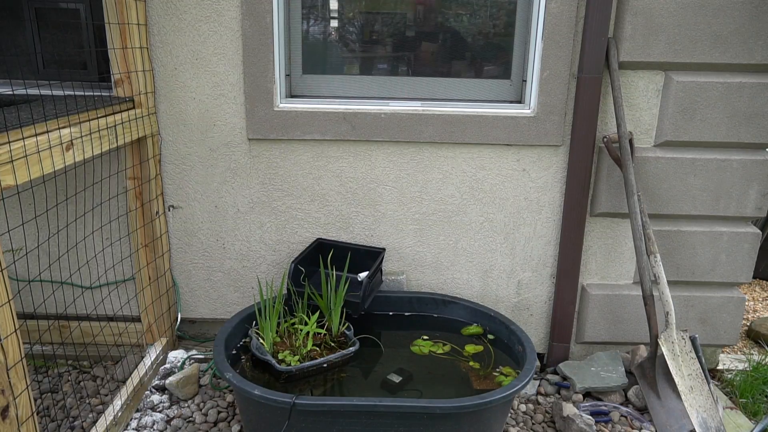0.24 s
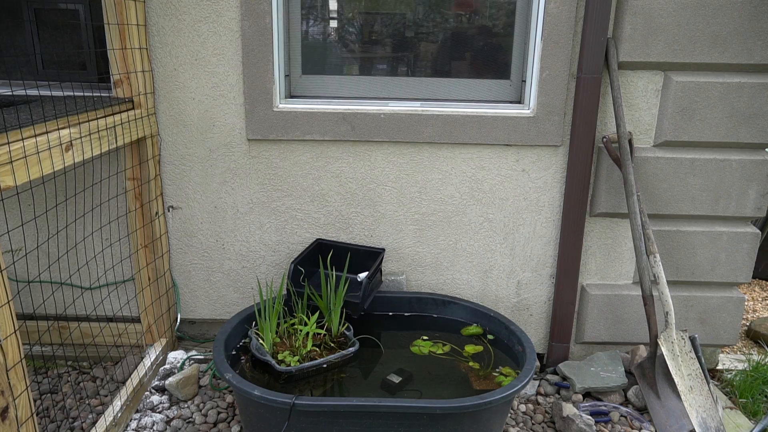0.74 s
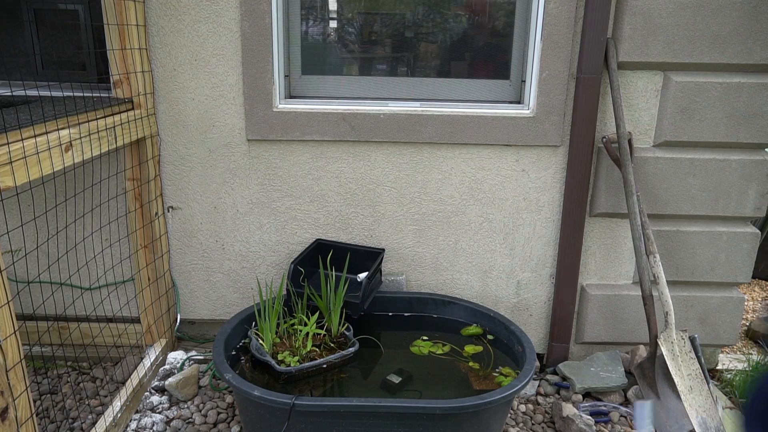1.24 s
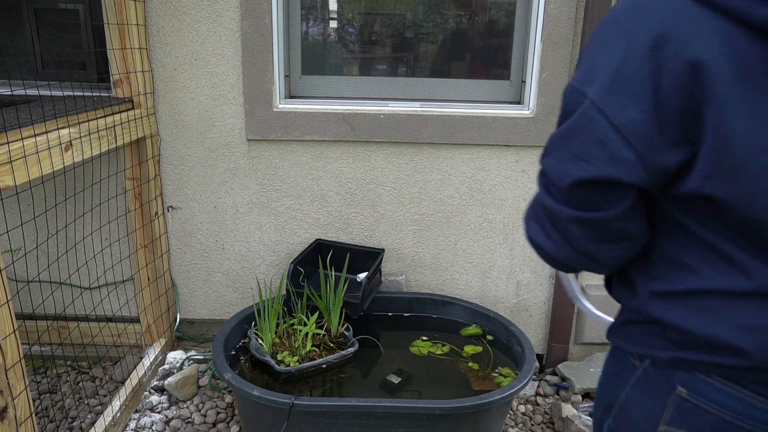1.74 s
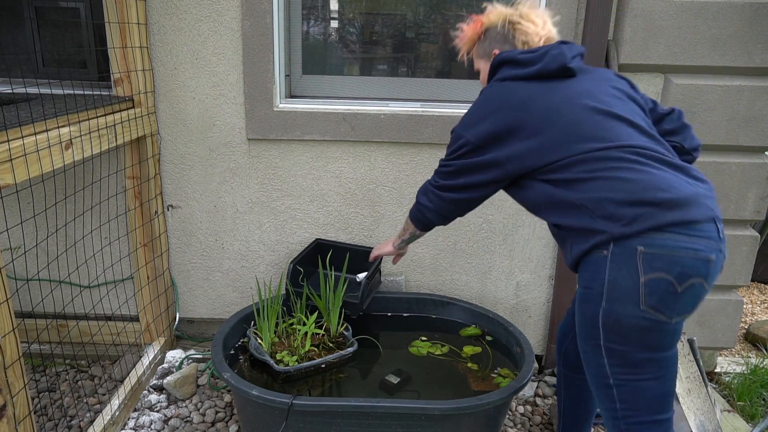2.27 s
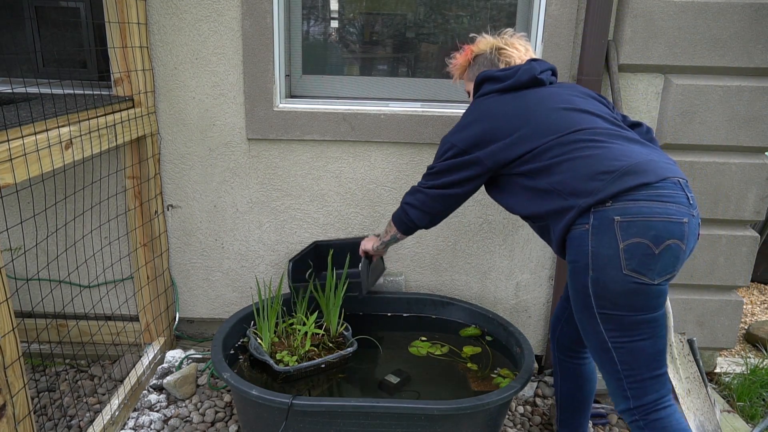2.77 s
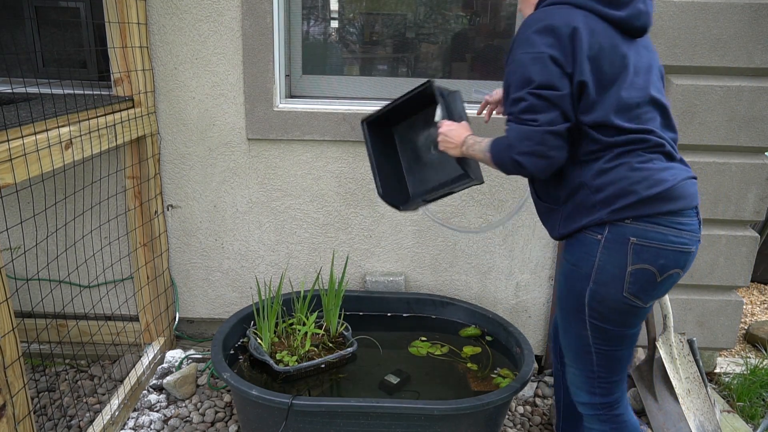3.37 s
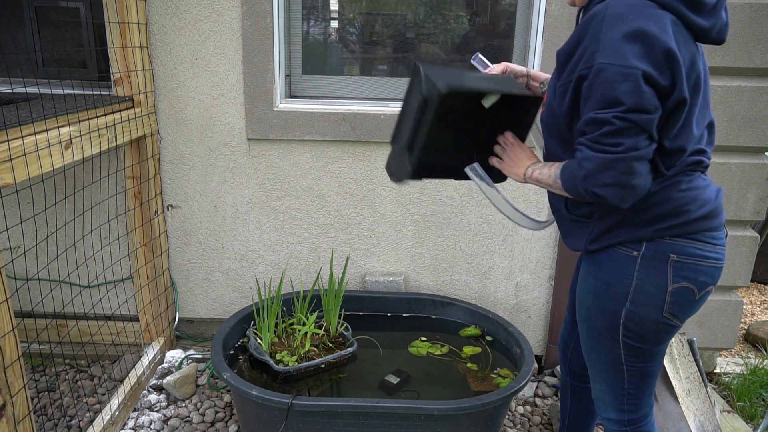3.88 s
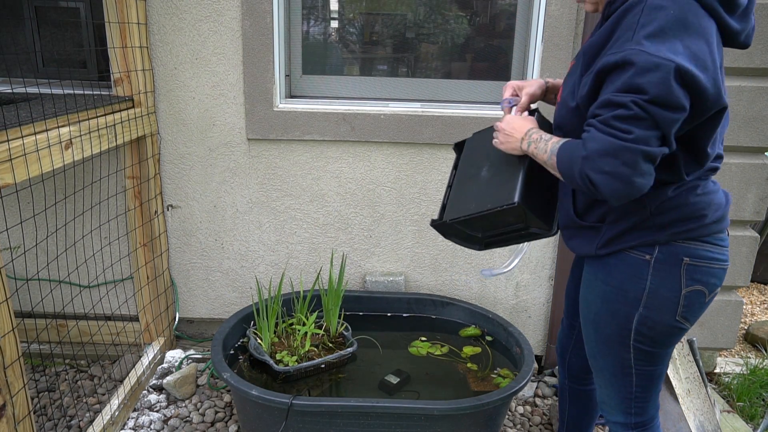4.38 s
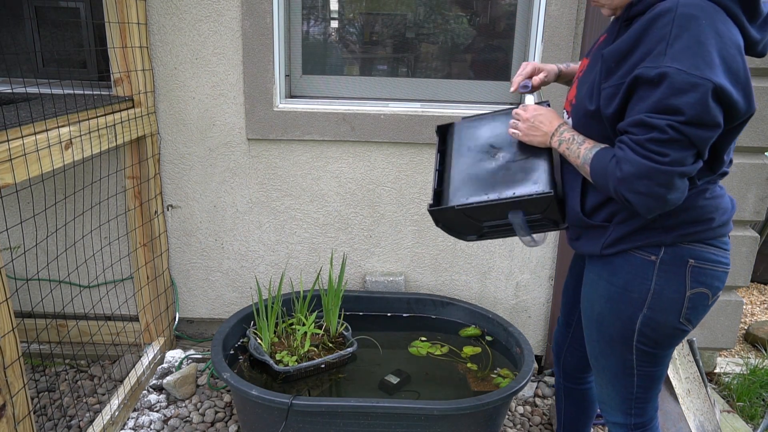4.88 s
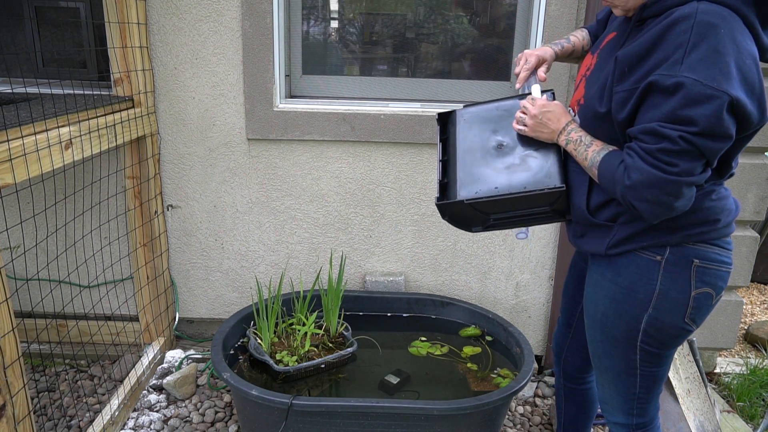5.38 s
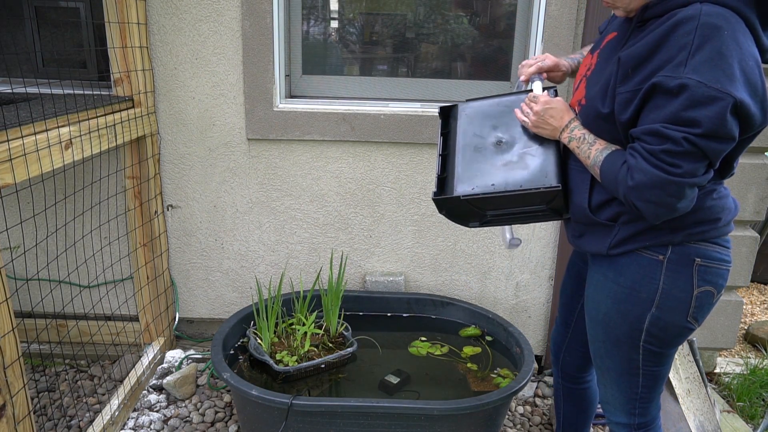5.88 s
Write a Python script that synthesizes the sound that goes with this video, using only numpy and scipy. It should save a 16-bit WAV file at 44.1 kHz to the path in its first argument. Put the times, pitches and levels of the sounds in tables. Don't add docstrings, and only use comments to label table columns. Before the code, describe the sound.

Small birds chirp, buzz, cluck and whistle throughout a small walled yard with short echoes. Gravel ticks and crunches under shifting feet, then a hollow plastic box scrapes free, clacks hard on a tub edge and gives scattered hollow knocks as it is carried. Wind buffets the small camera microphone over distant traffic rumble.

```python
import sys
import numpy as np
from scipy import signal
from scipy.fft import rfft, irfft, next_fast_len
from scipy.io import wavfile
from scipy.ndimage import uniform_filter1d, map_coordinates

SR = 44100
rng = np.random.default_rng(int(sys.argv[2]) if len(sys.argv) > 2 else 0)


def store_wav(level_fs):
    pcm = np.round(np.clip(np.atleast_2d(level_fs), -1, 1) * 32767)
    wavfile.write(sys.argv[1], SR, pcm.T.astype(np.int16))


def boost_factor(decibels):
    exponent = np.asarray(decibels, float) / 20
    return 10 ** exponent


N = 269892


def unit(x):
    return x / np.sqrt(np.mean(x ** 2) + 1e-20)


def along(points, hz):
    point_hz, value = np.transpose(points)
    return np.interp(np.log(hz + 1), np.log(point_hz + 1), value)


def wobble(rate, size=N):
    knots = rng.standard_normal(size // 20 + 8)
    return map_coordinates(knots, [2 + np.arange(size) * min(rate, 2000) / SR])


def filtered(x, spectrum):
    size = x.shape[-1]
    padded = next_fast_len(size + 8192)
    gain = boost_factor(along(spectrum, np.fft.rfftfreq(padded, 1 / SR)))
    return irfft(rfft(x, padded) * gain, padded)[..., :size]


def add(bus, s, x, pan_db):
    start = round(s * SR)
    x = x[max(-start, 0):]
    part = bus[:, max(start, 0):][:, :len(x)]
    part += x[:part.shape[1]] * boost_factor([[pan_db / 2], [-pan_db / 2]])


def voice(track, overtones_db, burr, edge, trill_hz=0, droop_db=0):
    s, hz = np.transpose(track)
    t = np.arange(round(s[-1] * SR)) / SR
    size = len(t)
    trill = trill_hz * np.sin(2 * np.pi * 68 * t + 2.41 * wobble(40.04, size=size))
    phase = 2 * np.pi * np.cumsum(np.interp(t, s, hz) + trill) / SR
    rough, burr_hz = burr
    grain = 1 - rough + rough * (wobble(burr_hz, size=size) + 1j * wobble(burr_hz, size=size))
    grain = grain * boost_factor(2.5 * rough * wobble(45, size=size))
    tone = 0
    for k, db in enumerate(overtones_db, 1):
        tone = tone + boost_factor(db - droop_db * k * t / s[-1]) * np.imag(grain * np.exp(1j * k * phase))
    fade = np.sin(np.pi / 2 * np.clip(np.minimum(t / edge, (s[-1] - t) / (2 * edge)), 0, 1)) ** 2
    return tone / np.sqrt(np.mean(abs(grain) ** 2) / 2) * fade


# frequency [hz], t60 [s]
YARD = [(300, 0.15), (2000, 0.3), (5000, 0.47), (11000, 0.17)]


def yard(bus, wet_db):
    hz, t, z = signal.stft(rng.standard_normal((2, SR // 2)), SR, nperseg=256)
    tail = signal.istft(z * boost_factor(-60 * t / along(YARD, hz)[:, None]), SR, nperseg=256)[1]
    tail = np.pad(tail / np.linalg.norm(tail[0]), ((0, 0), (250, 0)))
    return bus + boost_factor(wet_db) * signal.fftconvolve(bus.mean(0)[None], tail, axes=1)[:, :N]


def flock(notes, burr, edge, wet_db, side_db=0, sag=0., trill_hz=0, droop_db=0):
    bus = np.zeros((2, N))
    for start, end, first_hz, last_hz, db, *pan_db in notes:
        length = end - start + edge
        middle_hz = (first_hz + last_hz) / 2 * (1 - sag)
        track = [(0, first_hz), (length / 2, middle_hz), (length, last_hz)]
        tone = voice(track, [0, -32], burr, edge, trill_hz, droop_db)
        add(bus, start - edge / 2, boost_factor(db) * tone, side_db + sum(pan_db))
    return yard(bus, wet_db)


# rough share [0-1], burr rate [hz]
BURR = dict(slide=(.55, 150), clear=(.2, 35), buzz=(.55, 280), cluck=(.6, 300), warble=(.35, 120),
        far=(.35, 35), chirp=(.45, 250), rasp=(.85, 900))
# start_s, length_s, first_hz, level_db
SLIDES = [(0.715, 0.26, 3747, -52.5), (1.675, 0.31, 3788, -49.5), (3.608, 0.23, 3750, -49),
          (4.859, 0.25, 3930, -51.5)]


def sliders():
    fall_hz_per_s = 4050
    slides = [(s, s + length, hz, hz - fall_hz_per_s * length, db) for s, length, hz, db in SLIDES]
    top = [(s, s + 0.067, 6300, 6300, db - 18.0) for s, _, _, _, db in slides]
    return flock(slides + top, BURR["slide"], edge=.022, wet_db=-4.0, side_db=17.0, sag=0.027,
                 trill_hz=85.0, droop_db=-1.5)


# start_s, first_hz, level_db
BUZZES = [(0.323, 3872, -47), (1.118, 3750, -51), (2.552, 3960, -49.5), (3.998, 3850, -49.5),
          (5.434, 3865, -48), (6.057, 3885, -48.5)]
# start_s, level_db
UPSLURS = [(0.712, -52.5), (3.599, -60), (4.88, -60)]


def buzzers():
    buzzes = [(s, s + 0.037, hz, hz - 113, db) for s, hz, db in BUZZES]
    top = [(s, end, 6300, 6250, db - 14.0) for s, end, _, _, db in buzzes]
    upslurs = [(s, s + 0.0413, 5110, 5500, db, -4) for s, db in UPSLURS]
    return flock(buzzes + top + upslurs, BURR["buzz"], edge=0.016, sag=-0.0296, wet_db=-2.5, side_db=20.0)


# start_s, first_hz, level_db
CLUCKS = [(0.279, 1610, -62), (0.54, 1744, -65), (0.78, 1720, -61), (1.068, 1744, -51), (1.476, 1780, -50),
          (1.757, 1700, -52), (2.24, 1740, -52), (3.879, 1874, -53), (6.03, 1776, -62)]


def cluckers():
    clucks = [(s, s + 0.0376, hz, hz - 126, db) for s, hz, db in CLUCKS]
    return flock(clucks, BURR["cluck"], edge=0.00487, wet_db=-8, side_db=2.0)


# start_s, end_s, first_hz, last_hz, level_db
WARBLES = [(2.478, 2.503, 2260, 2320, -43), (2.87, 2.935, 2125, 2064, -51), (3.088, 3.115, 2150, 2090, -41),
           (4.862, 4.915, 2030, 1990, -49.5), (5.03, 5.095, 2023, 2070, -49.5),
           (2.435, 2.465, 2376, 2240, -43.5), (2.47, 2.5, 2550, 2515, -44.5), (2.5, 2.56, 2080, 1945, -56),
           (4.09, 4.17, 3196, 3148, -51), (4.145, 4.21, 2360, 2145, -52.5), (4.19, 4.25, 2660, 2700, -43.5),
           (4.27, 4.3, 2700, 2580, -68), (4.31, 4.41, 3250, 3180, -53.5), (4.41, 4.48, 2234, 2290, -55),
           (4.43, 4.5, 2667, 2694, -47)]
# start_s, end_s, first_hz, last_hz, level_db
SIGH = [
    (-.075, -0.035, 3250, 3000, -48),
    (0, .055, 2850, 2788, -40),
    (.055, .115, 2768, 2430, -43.5),
]
# accent_s, slowness [factor]
SIGHS = [
    (3.539, .97),
    (5.557, 1.03),
]


def warblers():
    sighs = [(s + slow * start, s + slow * end, first_hz, last_hz, db)
             for s, slow in SIGHS for start, end, first_hz, last_hz, db in SIGH]
    return flock(WARBLES + sighs, BURR["warble"], edge=0.016, wet_db=-3.0, droop_db=1.5, sag=0.015)


# start_s, end_s, first_hz, last_hz, level_db
RASPS = [(3.501, 3.535, 2830, 2410, -43.5), (5.511, 5.54, 2900, 2390, -44), (2.977, 2.993, 2300, 1550, -41),
         (3.617, 3.672, 6760, 7700, -62), (4.524, 4.604, 7020, 5500, -65), (4.676, 4.737, 7000, 5500, -66),
         (5.005, 5.064, 4720, 4550, -58.5), (5.114, 5.127, 3090, 2500, -45.5),
         (5.14, 5.162, 2754, 2700, -47.5), (0.398, .43, 4620, 4540, -60), (5.239, 5.342, 4670, 4920, -65)]


def raspers():
    notes = [(*note, 2.5 * (note[2] - 2300) / 1000) for note in RASPS]
    return flock(notes, BURR["rasp"], edge=0.00228, wet_db=-4.0)


# start_s, end_s, pitch_hz, level_db
HELD = [(0.455, 0.51, 1790, -65), (0.587, 0.655, 7440, -65), (1.335, 1.383, 5500, -62),
        (1.39, 1.477, 5500, -54.5), (1.53, 1.608, 5480, -90), (1.317, 1.49, 4020, -67),
        (2.073, 2.328, 4053, -57), (2.428, 2.778, 4013, -61.5), (2.816, 2.993, 3970, -57),
        (3.068, 3.27, 3970, -55.5), (3.368, 3.7, 3986, -61.5), (3.765, 3.93, 3810, -53.5),
        (3.93, 3.99, 3790, -61), (4.416, 4.585, 1833, -65.5), (4.726, 4.797, 5440, -69),
        (6.064, 6.135, 7500, -59.5)]
# start_s, end_s, first_hz, last_hz, level_db
FAR_RIGHT = [(0.37, 0.95, 5480, 5570, -66), (1.083, 1.31, 5370, 5510, -62.5),
             (1.152, 1.384, 2515, 2370, -73), (1.153, 1.4, 3420, 3250, -63),
             (1.602, 1.99, 4265, 4080, -64.5), (2.455, 2.7, 5110, 4770, -68),
             (5.804, 5.858, 3550, 3400, -66.5)]
# start_s, end_s, first_hz, last_hz, level_db
FAR_LEFT = [(0, 0.24, 6920, 6680, -71), (0.473, 0.56, 4680, 5380, -59.5), (2.467, 2.584, 7050, 7400, -66),
            (2.804, 2.858, 4700, 5900, -62), (5.085, 5.156, 4800, 5030, -58),
            (5.148, 5.195, 5140, 7030, -64), (5.185, 5.232, 3500, 3760, -58.5),
            (5.191, 5.267, 7220, 7400, -67), (5.328, 5.401, 3030, 3290, -62.5)]


def far_whistlers():
    held = [(start, end, hz, hz, db, -6) for start, end, hz, db in HELD]
    right = [(*note, -14) for note in FAR_RIGHT]
    left = [(*note, 12) for note in FAR_LEFT]
    return flock(held + right + left, BURR["far"], edge=0.022, trill_hz=27.0, wet_db=-3)


def slurred(note, burr):
    s, hz, db = np.transpose(note)
    tone = voice(np.transpose([s - s[0], hz]), [0, -32], burr, 0.0042)
    level_db = np.interp(np.arange(len(tone)) / SR, s - s[0], db)
    return np.pad(tone * boost_factor(level_db), (round(s[0] * SR), 0))


# time_s, pitch_hz, level_db
SLURS = [
    [(2.345, 3360, -50), (2.365, 3060, -45.5), (2.405, 2820, -45), (2.435, 2780, -44)],
    [(2.935, 2830, -49), (2.955, 3130, -45), (2.99, 3100, -48)],
    [(2.963, 2780, -45), (2.985, 2390, -42), (3.0, 2310, -39), (3.015, 2450, -50), (3.04, 2500, -43),
     (3.07, 2260, -48)],
    [(4.888, 2400, -59), (4.92, 2940, -47), (4.955, 3370, -42)],
    [(4.943, 2810, -38), (4.958, 2544, -41.5), (4.972, 2400, -37.5), (5.0, 2406, -47.5), (5.03, 2290, -50)],
    [(5.665, 3600, -52), (5.688, 3470, -38.5), (5.708, 3270, -54)],
]
# time_s, pitch_hz, level_db
WHISTLE = [(2.44, 3400, -59), (2.5, 3370, -57), (2.6, 3317, -54.5), (2.71, 3170, -60)]


def slurs():
    bus = np.zeros((2, N))
    for note in SLURS:
        add(bus, 0, slurred(note, BURR["warble"]), 0.5)
    add(bus, 0, slurred(WHISTLE, BURR["clear"]), -14)
    return yard(bus, -4.5)


# start_s, pitch [factor], level_db, length [factor], lead of the rising voice_s
SPARROW = [(.001, 0.98, -53.5, 0.88, 0.017), (0.199, 0.95, -54.5, 1.02, 0.019),
           (0.396, 0.99, -53, 0.84, 0.014), (0.628, 1.03, -55, 0.87, 0.019),
           (0.772, 1.01, -46, 0.95, 0.022), (4.338, 0.97, -48, 1.08, 0.02), (5.463, 1.01, -53, 0.77, 0.018),
           (5.672, 1.04, -53, 0.8, 0.017), (5.881, 0.99, -54, 1.0, 0.012), (6.084, 1.03, -49, 0.94, 0.014)]
# time_s, pitch_hz
HOOK = [(0, 4089), (.03, 4010), (.043, 3700), (.052, 2790), (.067, 1920)]
# time_s, pitch_hz
FAR_HOOK = [(0, 4060), (.01, 4210), (.03, 4030), (.039, 3680), (.047, 3300), (.056, 2300)]
# time_s, pitch_hz
RISE = [(0, 1640), (.012, 2604), (.025, 3270), (.05, 3356), (.09, 3280)]
# time_s, pitch_hz
FAR_RISE = [(0, 2850), (.007, 3180), (.018, 3300), (.06, 3360)]
# late_s, level_db
WALLS = [
    (0, 3),
    (.013, -1),
    (0.026, -13),
]
# frequency [hz], level_db
HEDGE = [(2200, -1), (3100, -0.5), (3600, 4), (4200, 0.5), (7000, -2.5)]


def sparrow():
    perch, hedge = np.zeros((2, 2, N))
    burr = BURR["chirp"]
    for s, pitch, db, length, lead in SPARROW:
        bright_db = 1.4 * (db + 50.5)
        overtones_db, stretch = [0, -21 + bright_db], [length, pitch]
        if db > -50:
            bus = perch
            hook = boost_factor(db + 4.5) * voice(np.multiply(HOOK, stretch), overtones_db, burr, 0.0076, droop_db=6)
            rise = voice(RISE, [-5, 0], burr, 0.029, droop_db=7.5)
        else:
            bus = hedge
            hook = boost_factor(db - 1.5) * voice(np.multiply(FAR_HOOK, stretch), overtones_db, burr, 0.0076, droop_db=-1)
            rise = voice(FAR_RISE, [-12, -1.5], burr, 0.0045, droop_db=4.5)
        rise = boost_factor(db - 3) * rise
        rasp = voice(np.multiply(RISE[:3], [1, pitch]), [-6, 0, -11], BURR["rasp"], 0.0019)
        rasp = boost_factor(db - 9 + bright_db) * rasp
        for late, echo_db in WALLS:
            add(bus, s + late, boost_factor(echo_db) * hook, 4.5)
            add(bus, s - lead + late, boost_factor(echo_db) * rise, 4.5)
            add(bus, s - lead + late, boost_factor(echo_db) * rasp, 4.5)
    return yard(perch, -3.5) + yard(filtered(hedge, HEDGE), -3.5)


def ring(modes, t, detune=0.):
    spread = rng.normal(0, 1, (len(modes), 2))
    total = 0
    for k, (hz, db, t60) in enumerate(modes):
        decay = boost_factor(db + spread[k, 0] - 60 * t / t60)
        total = total + (-1) ** k * decay * np.sin(2 * np.pi * hz * (1 + detune * spread[k, 1]) * t)
    return total


def crack(t, t60, spectrum):
    return unit(filtered(rng.standard_normal(len(t)), spectrum)) * boost_factor(-60 * t / t60)


BLOW_T = np.arange(SR // 2) / SR
SNAP = [(400, 2), (1200, 8.5), (2800, 8.5), (11000, -13.5)]

# frequency [hz], level_db, t60 [s]
THUD = [(194.5, 2, 0.14), (329, 7, 0.052)]
# frequency [hz], level_db, t60 [s]
HOLLOW = [(438.2, 3.5, 0.065), (535, 6, 0.058)]
# frequency [hz], level_db, t60 [s]
PANELS = [(812, 15.5, 0.024), (974, 9.5, 0.036), (1279, 14, 0.014)]
# frequency [hz], level_db, t60 [s]
RIM = [(1628, 0, 0.031), (2076, -1, 0.032), (2566, -4, 0.02), (3250, -2, 0.025)]
# start_s, snap_db, then against it thud_db, hollow_db, panels_db
RESTING = [(1.228, -43.5, -15, 1.5, -13), (1.295, -46.5, -22, -6, 0.5), (2.0471, -42.5, -3, -11, -5)]
LIFTED = [(3.3102, -17.5, -15, -12, -23), (3.5336, -19, -23, -8.5, -15.5), (3.7477, -32, -19, -12.5, -18),
          (3.9046, -38.5, -19, -10.5, -7)]
CARRIED = [(4.0705, -34.5, -9, 6.5, -2), (4.8, -31, -4.5, 9, 0.5), (5.075, -46.5, -9, 0.5, -3.5),
           (5.541, -26, -3.5, 5.5, 4.5), (5.7348, -46.5, -8, 10, -2), (5.7464, -44, -27, 7.5, -3.5)]
# level_db; the freer the box, the more it rings
RIM_DB = (-22, -9.5, 6)


def knocks():
    bus, t = np.zeros((2, N)), BLOW_T
    for stage, rim_db in zip((RESTING, LIFTED, CARRIED), RIM_DB):
        for s, db, thud_db, hollow_db, panel_db in stage:
            walls = boost_factor(thud_db) * ring(THUD, t, 0.08)
            walls = walls + boost_factor(hollow_db) * ring(HOLLOW, t, 0.017)
            walls = walls + boost_factor(panel_db) * ring(PANELS, t, 0.02)
            walls = walls * (1 - np.exp(-t / 0.0033))
            rim = boost_factor(rim_db - 4.5) * ring(RIM, t, 0.077)
            snap = crack(t, 0.0089, SNAP) + boost_factor(-8.0) * crack(t, 0.058, SNAP)
            add(bus, s, boost_factor(db - 2.0) * (walls + rim + snap), -1.8)
    return bus


# start_s, peak level_db
CLACK = [
    (3.2886, -16.5),
    (3.2925, -14),
    (3.3013, -23),
    (3.345, -40),
]
# frequency [hz], level_db, t60 [s]
TUB = [(517, -20, 0.043), (943, -11.5, 0.03), (1617, 2, 0.023), (1752, -1.5, 0.042), (1930, -0.5, 0.036),
       (2780, -19, 0.027), (3470, -7, 0.021), (6500, -15, 0.0156)]
# frequency [hz], level_db
TUB_TAIL = [(600, -4.5), (1300, -11), (1550, 10), (1950, 7), (2400, -27), (3500, -49), (7000, -16),
            (11000, -21)]


def clack():
    bus, t = np.zeros((2, N)), BLOW_T
    for s, db in CLACK:
        flutter = boost_factor(3 * wobble(384, size=len(t)))
        tub = ring(TUB, t, 0.026) * flutter * (1 - np.exp(-t / 0.00007))
        add(bus, s, boost_factor(db) * (tub + boost_factor(-11.5) * crack(t, 0.04, SNAP)), -0.3)
    add(bus, CLACK[0][0], boost_factor(-34.0) * crack(t, 0.5, TUB_TAIL), -1)
    return bus


# frequency [hz], level_db, t60 [s]
SLAP = [(1865, -2, 0.036), (2500, 2.5, 0.019), (2790, -10.5, 0.045), (4000, -6.5, 0.026), (6000, -8, 0.017)]
# frequency [hz], level_db, t60 [s]
SLAP_BODY = [(180, -3, 0.09), (330, -6, 0.041), (480, -11.5, .03)]


def slap():
    bus, t = np.zeros((2, N)), BLOW_T
    start_s, late_s, level_db = 2.7606, 0.00336, -26
    snap = boost_factor(-2.5) * crack(t, 0.038, [(800, -8), (2500, 4), (11000, -8)])
    bottom = (1 - np.exp(-t / 0.0005)) * (ring(SLAP, t) + snap)
    wall = (1 - np.exp(-t / 0.0016)) * ring(SLAP_BODY, t)
    add(bus, start_s, boost_factor(level_db) * bottom, -0.7)
    add(bus, start_s + late_s, boost_factor(level_db + 4) * wall, 0)
    return bus


def box():
    return yard(knocks() + clack() + slap(), -11.5)


# start_s, peak level_db, low part_db
TICKS = [(1.2714, -46, -21), (1.2809, -54, -25.5), (1.9719, -55, -7), (1.9845, -42.5, 2.5),
         (2.0005, -39.5, -3.5), (2.0239, -45, -4), (2.0742, -35, -24), (2.078, -46, -20), (2.303, -60, 0),
         (2.358, -42, -7), (2.99, -49.5, 3), (4.0742, -38, -15), (5.072, -40.5, -26)]
# start_s, length_s, centre_hz, level_db
SCUFFS = [(0.312, 0.14, 10400, -59.5), (.432, 0.0046, 10500, -48), (1.159, 0.022, 7950, -54.5),
          (1.295, .02, 6000, -66), (2.36, 0.012, 8500, -51), (1.258, 0.051, 7500, -51.5),
          (1.975, 0.017, 2480, -41.5), (1.987, 0.041, 3740, -46), (2.046, 0.045, 3030, -49),
          (2.15, 0.044, 4160, -51.5), (3.206, 0.034, 6000, -64), (3.772, .012, 7500, -52.5),
          (4.066, 0.082, 8060, -54.5)]


def gravel():
    bus, t = np.zeros((2, N)), np.arange(SR // 10) / SR
    for s, db, low_db in TICKS:
        high = crack(t, 0.01, [(2000, 0), (4500, 5.5), (11000, -8.5)])
        low = crack(t, 0.084, [(400, -11.5), (1200, -8.0), (3200, -4.0), (5000, -23.5)])
        add(bus, s - .0005, boost_factor(db + 3.0) * (high + boost_factor(low_db) * low), -6)
    for s, length, hz, db in SCUFFS:
        size = round(1.33 * length * SR)
        slopes = [(hz / 8, -31.5), (hz, 0), (hz * 8, -31.5)]
        grains = rng.standard_normal(size) * boost_factor(4.5 * wobble(490, size=size))
        grit = unit(filtered(grains, slopes)) * np.sqrt(np.hanning(size))
        add(bus, s - 0.22 * length, boost_factor(db) * grit, -4)
    return yard(bus, -6)


# start_s, length_s, first_hz, level_db
BLOOPS = [
    (0.801, .018, 610, -59),
    (0.827, 0.034, 493, -57),
    (0.862, .015, 880, -68),
]


def tub_water():
    notes = [(s, s + length, hz, hz * 1.57, db) for s, length, hz, db in BLOOPS]
    return flock(notes, (0, 35), edge=0.0079, wet_db=-15)


def rush(spectrum, alike, patchy_db):
    z = signal.stft(rng.standard_normal((2, N)), nperseg=512)[2]
    field = uniform_filter1d(rng.standard_normal(z.shape[1:]), 6, 0)
    field = uniform_filter1d(field, 12, 1)
    noise = signal.istft(z * boost_factor(patchy_db * unit(field)), nperseg=512)[1][:, :N]
    mid, side = filtered(noise, spectrum)
    turn = np.arccos(np.clip(alike, 0, 1)) / 2
    return unit(np.cos(turn) * mid + np.sin(turn) * side * [[1], [-1]])


def swells(starts, holds, levels_db, rise_db_per_s, fall_db_per_s, rest_db):
    t = np.arange(0, N + 64, 64)[:, None] / SR
    before, after = np.maximum(starts - t, 0), np.maximum(t - starts - holds, 0)
    below_db = rise_db_per_s * before + fall_db_per_s * after
    power = boost_factor(2 * rest_db) + boost_factor(2 * (levels_db - below_db)).sum(axis=1)
    return np.interp(np.arange(N) / SR, t[:, 0], np.sqrt(power))


# start_s, gravel level_db, cloth and bustle level_db
STEPS = [(.44, -76, -85.5), (0.799, -68, -81), (1.261, -64.5, -75.5), (2.03, -68.5, -62), (2.3, -63.5, -65),
         (2.84, -59.5, -55), (3.22, -69, -54.5), (3.7, -66.5, -57), (4.12, -63.5, -55), (5.65, -106, -56),
         (6.11, -84, -67)]
# frequency [hz], level_db
HISS = [(710, -7.5), (1200, -17.5), (1690, -4.5), (2440, -4), (4630, -10), (5900, -11.5), (10600, -17),
        (11300, -20), (12200, -87), (15900, -103), (22000, -120)]
# frequency [hz], level_db
MURMUR = [(150, -13.5), (250, -15), (409, -13.5), (481, -19.5), (681, -18.5), (1110, -12.5), (2290, -26.5),
          (2500, -18), (3250, -39), (5500, -120)]


def shifting():
    s, gravel_db, bustle_db = np.transpose(STEPS)
    hiss = unit(boost_factor(0.36 * wobble(300)) * rush(HISS, alike=0.2, patchy_db=1.8))
    hiss = boost_factor(10.5) * swells(s, 0, gravel_db, 40, 35, -67) * hiss
    murmur = swells(s, 0, bustle_db, 40, 35, -57.5) * rush(MURMUR, alike=0.45, patchy_db=2.5)
    return hiss + murmur


# start_s, hold_s, level_db
PUFFS = [(0.203, 0.41, -53.5), (0.427, 0.046, -41.5), (0.793, 0.27, -53.5), (1.523, 0.086, -47),
         (1.76, 0.023, -38), (1.889, 0.053, -41), (2.048, 0.43, -46), (2.56, 0.24, -55), (2.776, 0.12, -42),
         (3.027, 0.05, -51.5), (3.21, 0.026, -40), (3.618, 0.75, -43), (4.303, 0.066, -43.5),
         (4.536, 0.39, -43.5), (5.061, 0.15, -42.5), (5.204, 0.4, -53), (5.528, 0.0067, -43.5),
         (5.798, 0.014, -37), (5.938, 0.0096, -39.5), (6.048, 0.043, -34)]
# frequency [hz], level_db
RUMBLE = [(12, -70), (20, -16), (69, 4), (118, 3.5), (167, -3.5), (195, -2), (420, -19.5), (543, -22),
          (1320, -120)]


def wind():
    lumps = boost_factor(3.28 * wobble(45) + 1.1 * np.array([wobble(31), wobble(11.0)]))
    turbulence = unit(lumps * rush(RUMBLE, alike=.93, patchy_db=1.2))
    buffet = swells(*np.transpose(PUFFS), 248, 196, -75) * turbulence
    turned = signal.hilbert(buffet.mean(0), next_fast_len(N))[:N].imag
    return buffet + 0.4 * filtered(turned, [(30, -15), (125, -2), (300, 3.5)]) * [[1], [-1]]


# frequency [hz], level_db
TRAFFIC = [(20, -24), (60, 2), (120, -8), (190, -13), (300, -14), (600, -48)]


def traffic():
    return boost_factor(-57.5) * rush(TRAFFIC, alike=1.0, patchy_db=4.5)


def scene():
    birds = sliders() + buzzers() + cluckers() + warblers() + raspers() + far_whistlers() + slurs() + sparrow()
    return birds + box() + gravel() + tub_water() + shifting() + wind() + traffic()


# frequency [hz], level_db
MIC = [(20, -19), (70, -6.5), (120, 2.5), (11000, 2), (11300, -32), (12500, -18), (14000, -60)]


def microphone(sound):
    return filtered(sound, MIC)


def roll_off(x):
    return signal.sosfilt(signal.butter(12, 12370, fs=SR, output="sos"), x)


def record(dry):
    mix = microphone(dry)
    return roll_off(mix)


dry = scene()
out = record(dry)
store_wav(out)
```